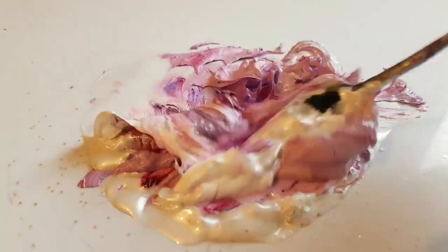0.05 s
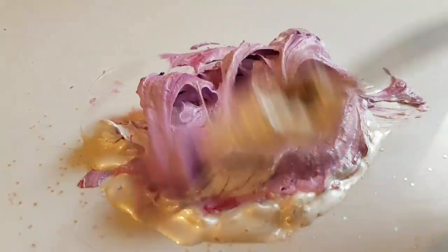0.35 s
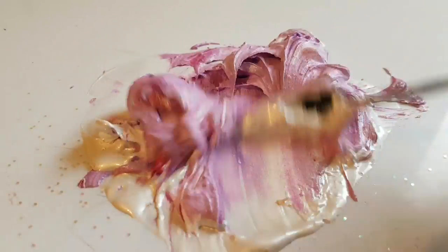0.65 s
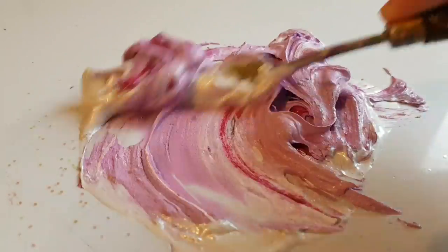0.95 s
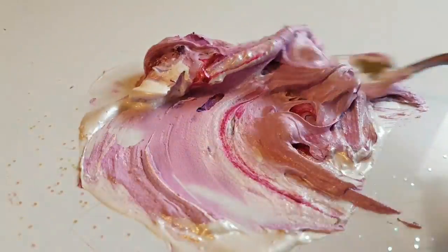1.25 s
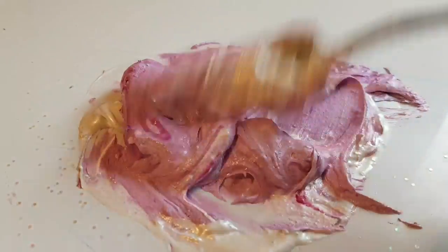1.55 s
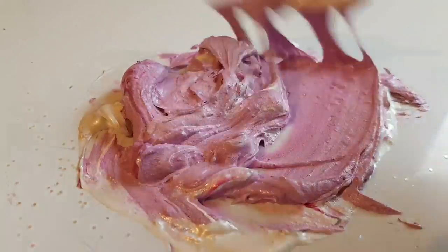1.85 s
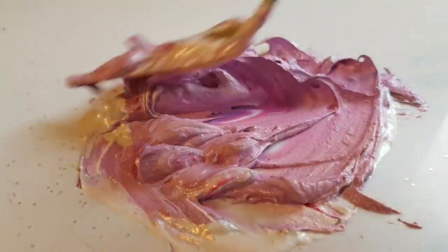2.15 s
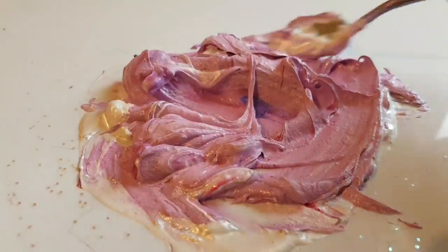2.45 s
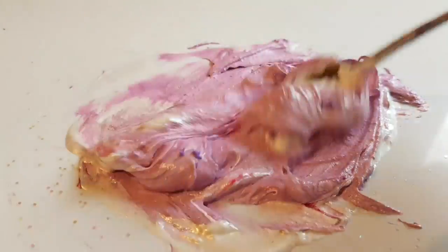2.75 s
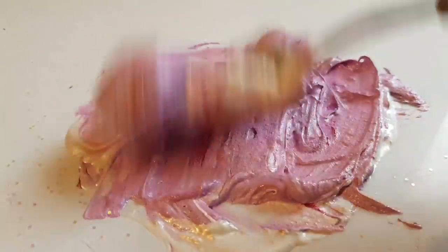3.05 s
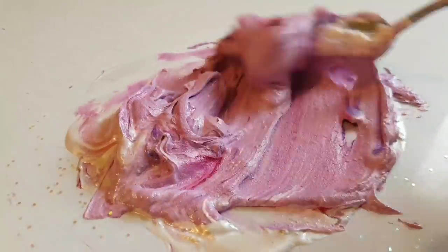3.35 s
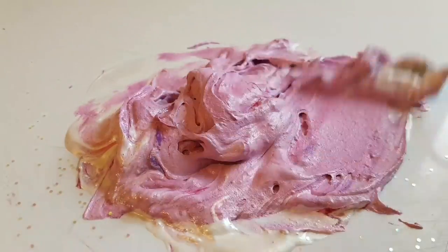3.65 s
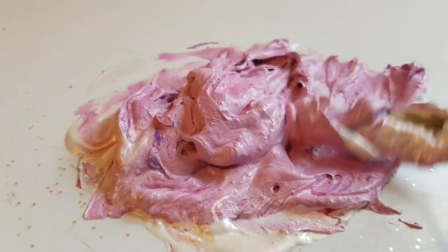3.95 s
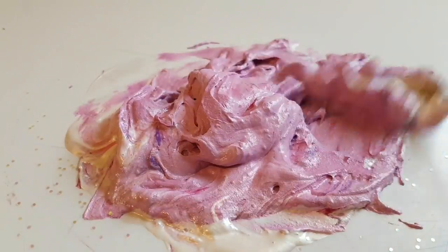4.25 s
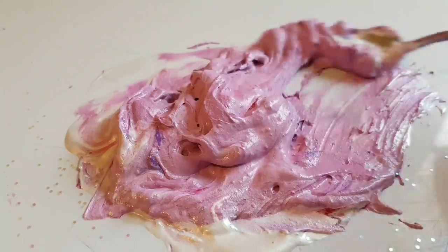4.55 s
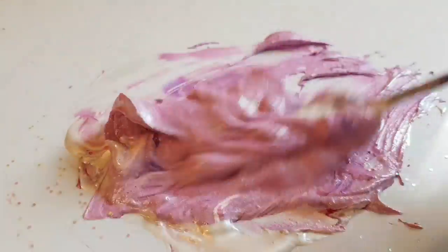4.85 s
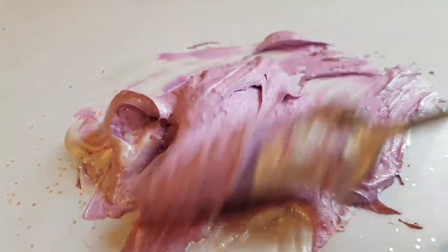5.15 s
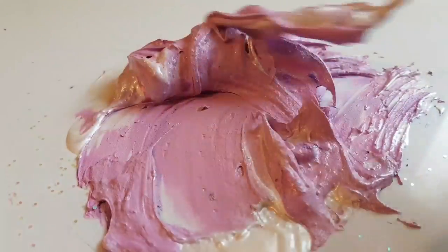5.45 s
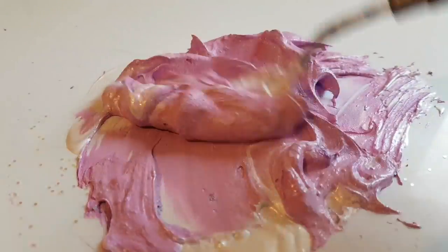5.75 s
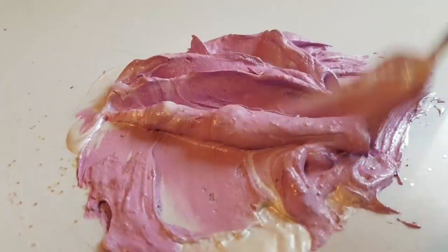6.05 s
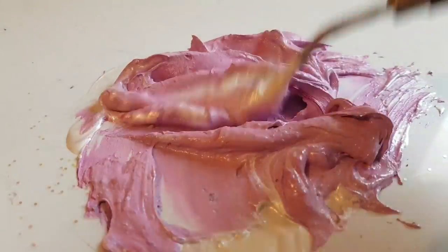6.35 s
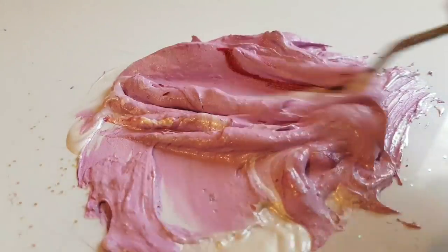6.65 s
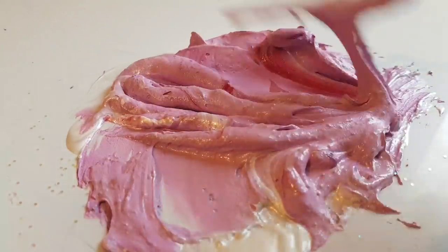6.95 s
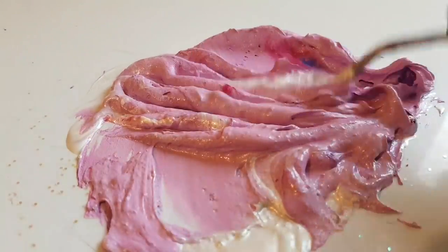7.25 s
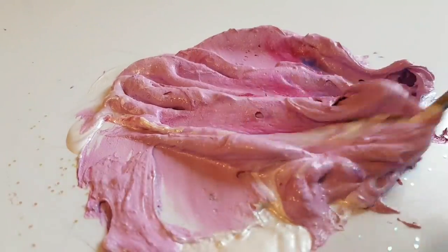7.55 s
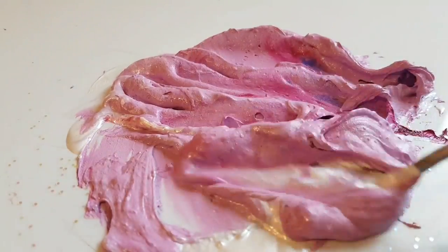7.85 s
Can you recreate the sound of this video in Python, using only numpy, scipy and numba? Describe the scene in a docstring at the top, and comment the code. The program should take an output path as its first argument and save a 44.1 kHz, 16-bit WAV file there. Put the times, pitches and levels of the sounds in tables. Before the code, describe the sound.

Close, sticky squelches and small air pops of paint being mixed with a steel knife, over the dull hum of vehicles outside.

```python
"""A steel palette knife folds thick paint on a glossy slab, close up in a quiet room.
Each stroke tears the wet film in a fine sticky hiss; trapped air pockets pop as the blade lifts,
threads of paint part with a tick, and now and then the steel knocks on the slab.
Outside, over dull road noise, a motor vehicle pulls away through its gears and another passes
farther off; their drone sets the low modes of the room booming."""
import sys
import numpy as np
from scipy import signal
from scipy.fft import rfft, irfft
from scipy.io import wavfile
from scipy.ndimage import uniform_filter1d
from numba import njit

SR = 44100
rng = np.random.default_rng(int(sys.argv[2]) if len(sys.argv) > 2 else 0)


def master_out(mix):
    """Clip the mix to full scale and print it as 16-bit PCM to the path in sys.argv[1]."""
    frames = np.transpose(np.atleast_2d(mix))
    ceiling = np.clip(frames, -1, 1)
    pcm = np.round(ceiling * 32767).astype(np.int16)
    wavfile.write(sys.argv[1], SR, pcm)


N = 352359
TIME = np.arange(N) / SR

# Knife strokes, before the layer gains; squelch and body ride on the hiss level:
# touch_s, peak_s, hiss_db, squelch_db, body_db, gap_at_peak_hz
STROKES = [(0, .002, -62.5, -3, 3, 5800), (.152, .202, -67, -3, -5, 4800),
           (.325, .362, -61.5, -3, -6, 5800), (.504, .524, -64, -1, -3, 6000),
           (.719, .722, -64.5, 4, -2, 4740), (.733, .748, -68.5, 1, 0, 4800),
           (.906, 1.049, -63.5, 0.5, -2.5, 4840), (1.3, 1.365, -62, 4, 0.5, 4840),
           (1.51, 1.535, -70, 5.5, 2.5, 5200), (1.71, 1.729, -64, 3.5, 0, 5800),
           (1.875, 1.898, -64, 2, 0, 6300), (2.07, 2.1, -65, -13, -6, 7000),
           (2.34, 2.385, -73, -1, -6, 5800), (2.567, 2.652, -63.5, 5, 1.5, 5300),
           (2.846, 2.87, -69, 4, -1.5, 5830), (3.018, 3.034, -65, -9, -9, 5790),
           (3.205, 3.222, -70.5, -8, -1, 5810), (3.35, 3.39, -74, -6, 1, 5800),
           (3.972, 4.007, -59, 5, -4.5, 6000), (4.149, 4.197, -56, 1, -5, 6490),
           (4.319, 4.326, -62.5, 5, 1, 4500), (4.335, 4.37, -55, 0, -6, 6000),
           (4.495, 4.545, -55.5, 5, -5, 6100), (4.649, 4.655, -68, 4, 2.5, 5655),
           (4.66, 4.705, -66.5, 7, -5, 6440), (4.68, 4.77, -56, 0, -2, 5200),
           (5.085, 5.125, -72, -2, 0, 5620), (5.289, 5.345, -55.5, -3.5, -6.5, 5200),
           (5.42, 5.438, -66.5, 4, -3.5, 5610), (5.615, 5.727, -70, -1, 0.5, 5640),
           (5.901, 5.95, -72, 1, -2, 5200), (6.092, 6.152, -74, -10, -6, 5805),
           (6.274, 6.355, -75.5, -1, 2.5, 5600), (6.48, 6.55, -73.5, 2, 1, 5630),
           (6.763, 6.81, -79, 5, 2.5, 6606), (7.47, 7.484, -75, 10, -7, 5540),
           (7.831, 7.85, -77, 8, 4, 6200)]
# The blade's steady drag between strokes: time_s, level_db
BLADE_DRAG = [(0, -91), (1.2, -80.5), (3.5, -84), (5.5, -85), (6.4, -86), (7.99, -81)]
# Tone of the tearing film, its bright top and its midrange: freq_hz, level_db
HISS_EQ = [(5000, -38), (8000, -4.5), (11000, -4.5), (15500, -7)]
BODY_EQ = [(600, -12), (1200, 0.5), (1900, -3.5), (2450, 3), (3000, -0.5), (3900, 0), (5500, -13)]

# Traffic through the walls: time_s, rumble_db, tyre_roar_db
TRAFFIC_LEVELS = [(0, -53.5, -60), (.7, -55, -60), (1.4, -51.5, -55), (2.1, -55, -58), (2.85, -52, -59),
                  (3.5, -52, -58.5), (4.0, -51, -57), (4.7, -49.5, -59.5), (5.4, -52, -60),
                  (6.3, -54, -61.5), (7.1, -53, -62), (7.99, -54, -60.5)]
# Swells of the road noise: time_s, deep_rumble_db, room_boom_db
TRAFFIC_SWELLS = [(0, -69, -70), (.7, -71, -60.5), (1.25, -59.5, -61.5), (1.65, -66, -61.5),
                  (2.6, -72, -64), (3.35, -67, -73), (4.7, -68, -71.5), (7.99, -68, -80)]
# Tone of each noise bed: freq_hz, level_db
RUMBLE_EQ = [(25, -20), (45, -10), (65, -7), (100, 8), (150, 11.5), (190, 0), (255, 2.5), (330, -4),
             (420, -6.5), (700, -37)]
TYRE_EQ = [(300, -9.5), (400, 0.5), (470, 1), (620, -2.5), (800, -8.5), (1200, -14), (2500, -22)]
DEEP_RUMBLE_EQ = [(40, -6.5), (55, 1), (75, -3)]
ROOM_TONE_EQ = [(530, 4), (900, -3), (1250, 0.5), (1790, -7), (3260, -4.5), (5480, -11.5), (8500, -16),
                (11600, -22), (14500, -22), (15400, -20), (16000, -45)]
# How alike the beds are left and right: freq_hz, likeness (0 wide, 1 mono)
STEREO_LIKENESS = [(60, 0.98), (140, 0.98), (350, 0.91), (700, 0.86), (1400, 0.02), (2800, 0), (15000, 0)]

# Air pockets; tear 0 rings like a closed cup, 1 rips wide open; snap and plop ride on the level:
# start_s, level_db, cavity_hz, tear, snap_db, plop_hz, plop_db, left_over_right_db
AIR_POCKETS = [(0.1607, -7, 4100, 0.41, -23, 1300, -19, 2), (0.203, -21, 4300, 0.26, -9.5, 1400, -16, 5),
               (0.331, -15, 4750, 1, -17, 1690, -10, 6), (.497, -11.5, 4500, 0.98, -18, 2300, -9, 2),
               (0.5222, -16.5, 3400, 0.47, -18, 1250, -0.5, 2), (0.7189, -6, 5100, 0.17, -9, 1300, -23, 1),
               (0.7198, -8, 5200, 0.52, -5, 1800, -17, -1), (0.7245, -9.5, 3900, 0.4, -17, 1400, -6, 3),
               (1.0434, -9, 4160, 0.38, -17, 1100, -11, 8), (1.3517, -2.5, 3350, 0.38, -28, 1110, -25, -2),
               (1.363, -13, 7000, 0.72, -15, 2400, -9, -3), (1.374, -5, 2540, 0.21, -27, 1100, -22, -2),
               (1.376, -12, 5300, 0.61, -22, 2430, -5, -4), (1.3818, 0.5, 5050, 0.98, -23.5, 2390, -20, -7),
               (1.4206, -6, 4860, 0.68, -34, 1630, -13.5, -5), (1.513, -15, 3740, 0.32, -25, 1100, -14, 5),
               (2.2833, -9.5, 4100, 0.6, -32, 1100, -16, 3), (3.0386, -22.5, 3453, 0.27, -15, 1100, -20, 5),
               (3.3494, -16.5, 3600, 0.69, -13, 1300, -12, 2),
               (3.3709, -17, 5400, 0.85, -12.5, 1100, -18, 1), (3.9595, -16, 4500, 0.6, -18, 1500, -11, 0),
               (4.015, -9, 6410, 0.53, -15, 1400, -24, 4), (4.2805, -18.5, 6000, .55, -21, 1500, -3, -6),
               (4.3297, -13.5, 2730, 0.7, -23, 1100, -20, -3),
               (4.3546, -12, 8000, 0.98, -12, 2300, -18, -2), (4.4918, -15, 5000, 1, -11, 2090, -2, 0),
               (4.5447, -6.5, 6260, 0.13, -16.5, 1400, -24, -8),
               (4.564, -11, 5900, 0.31, -23, 1400, -24, 2), (4.6506, -14, 5460, 0.55, -24, 1310, -8, 0),
               (4.796, -10.5, 3000, 0.37, -19, 1100, -22, 2),
               (5.0951, -4, 3600, .42, -24.5, 2300, -11, 4.5), (5.1624, -10.5, 4030, 0, -25, 1100, -28, -1),
               (5.29, -7.5, 3570, 0.29, -27, 1100, -28, 6), (5.3812, -10.5, 3920, .15, -23, 1100, -10, 5),
               (5.6345, -18, 6770, .12, -28, 1107, -18, 0), (5.853, -19, 3680, 0.67, -15, 1300, -7, 6),
               (6.158, -19.5, 4130, 0.95, -6.5, 1099, -2, 4), (6.2623, -3.5, 3950, .46, -34, 1308, -9.5, 2),
               (6.474, -22, 4270, 0.86, -12, 1200, 0, 4), (6.5876, -17.5, 4670, 0.71, -13.5, 1670, -0.5, 1),
               (6.8174, -17.5, 5400, 0.45, -24, 1100, -22, -2),
               (7.0303, -15, 5630, 0.72, -16, 2294, -8, -4), (7.15, -19, 3600, 0.62, -11, 1113, -16, -1),
               (7.2658, -11.5, 4000, 1, -12.5, 2000, -9, 1), (7.483, -16, 5370, .38, -24, 2298, -20, -4),
               (7.489, -16, 4300, .5, -24, 1400, -22, 0), (7.5925, -19, 3680, 0.32, -15.5, 1100, -8, 5),
               (7.6697, -14.5, 2304, 0.73, -14.5, 1100, -28, -3),
               (7.9476, -18, 3844, 0.53, -23, 1550, -0.5, 5)]

# The far engine, before the room's lift: time_s, firing_hz, level_db
FAR_ENGINE_RUN = [(0, 140.3, -93), (.3, 140.4, -61), (.55, 135.9, -59.5), (.82, 140, -63),
                  (.92, 142.5, -53.5), (1.38, 148.2, -52), (1.52, 152, -58), (2.25, 156.4, -56),
                  (2.55, 154.1, -70.5), (2.85, 152.3, -54.5), (3.05, 152.5, -74), (3.35, 152.9, -75),
                  (3.7, 152, -90), (4.9, 149, -68), (5.2, 148, -57), (5.45, 151.1, -66.5),
                  (7.99, 154.5, -94)]
# Its throb an octave below: time_s, level_db
FAR_THROB_LEVELS = [(0, -71), (1.4, -69), (1.9, -61.5), (2.3, -65), (2.8, -64.5), (3.35, -64), (3.9, -86),
                    (7.99, -88)]
# Its partials: firing_multiple, level_db
FAR_PARTIALS = [(1, -1.5), (3, -17)]
# Low room modes that lift any engine tone crossing them: pitch_hz, width_hz, lift_db
BOOM_MODES = [(56, 3.2, 2), (77.1, 0.81, 9), (147.25, 8, 12), (256.2, 7.5, 12), (303, 12.95, 8),
              (460.6, 4.5, 11.5)]

# Threads of paint parting as the blade pulls away: start_s, level_db
THREAD_TICKS = [(.578, -41), (.5875, -38), (.6933, -34), (0.804, -42), (1.2913, -31), (1.3975, -39),
                (2.042, -42), (2.061, -45), (2.242, -39), (2.5263, -36.5), (3.283, -38), (3.874, -41),
                (5.519, -31.5), (7.101, -43), (7.154, -45), (7.37, -44), (7.575, -46)]
# The blade knocking on the slab through the paint: start_s, slab_db, blade_db
BLADE_KNOCKS = [(0.719, -54, -69), (.7243, -50, -64), (1.4196, -53, -76), (5.0948, -50, -77),
                (5.2909, -53, -79)]
# Ring of the slab and of the blade: pitch_hz, level_db, t60_s
SLAB_MODES = [(283, 11.5, 0.021), (454, 8.5, 0.033), (710, -14, 0.059), (1060, -9, 0.019)]
BLADE_MODES = [(3900, -8, .1), (5200, 5, .09)]

# The near engine, before the room's lift: time_s, level_db
NEAR_ENGINE_LEVELS = [(1.4, -87), (1.55, -52), (1.85, -52.5), (2.2, -53), (2.6, -51), (2.85, -48),
                      (3.15, -49), (4.05, -48), (4.58, -42.5), (4.95, -52.5), (5.3, -48), (5.9, -53),
                      (6.08, -50.5), (6.25, -60.5), (6.8, -48.5), (7.5, -44), (7.99, -45)]
# Its gears, one a row: pull_s, lift_off_s, start_firing_hz, initial_rise_hz_per_s
NEAR_GEARS = [(1.655, 2.31, 115.5, 30), (2.901, 4.56, 112.3, 25.9), (5.5, 8, 110.7, 13.3)]
# Its partials: firing_multiple, level_db
NEAR_PARTIALS = [(.5, -35), (1, 0), (2, -22.5)]


def from_db(db):
    return 10 ** (np.asarray(db) / 20)


def unit_rms(x):
    return x / np.sqrt(np.mean(x ** 2) + 1e-20)


def automation(rows):
    """One curve over time for each column after the first."""
    times_s, *columns = np.transpose(rows)
    return [np.interp(TIME, times_s, column) for column in columns]


def per_bin(points):
    """A table over frequency, read at every bin of the spectrum."""
    hz, value = np.transpose(points)
    return np.interp(np.log(np.arange(N // 2 + 1) * SR / N + 1), np.log(hz), value)


def colour(x, eq):
    """Shape white noise with an EQ that rolls off past its ends, keeping the power."""
    curve = [(eq[0][0] / 2, -70), *eq, (eq[-1][0] * 2, -70)]
    return irfft(rfft(x) * unit_rms(from_db(per_bin(curve))), N)


def drift(rate_hz, hop=40):
    """Smooth random wander of spread 1."""
    pole = np.exp(-2 * np.pi * rate_hz * hop / SR)
    noise = rng.standard_normal(N // hop + 2002)
    slow = signal.lfilter([1], [1, -2 * pole, pole * pole], noise)[2000:]
    return np.interp(np.arange(N) / hop, np.arange(len(slow)), unit_rms(slow))


def resonate(x, hz, width_hz):
    """One resonance with unity peak gain; its width is capped at a Q of 0.8."""
    q = max(hz / width_hz, .8)
    return signal.lfilter(*signal.iirpeak(min(hz, SR / 3), q, fs=SR), x + 1e-18)


@njit
def sweep(x, hz, q):
    """A moving resonance with unity peak gain."""
    out, low, band = np.zeros(len(x)), 0., 0.
    for i in range(len(x)):
        g = np.tan(np.pi * hz[i] / SR)
        v = (band + g * (x[i] - low)) / (1 + g * (g + 1 / q))
        band, low = 2 * v - band, low + 2 * g * v
        out[i] = v / q
    return out


def impulses(times_s, levels_db):
    return np.bincount(np.round(times_s * SR).astype(int), from_db(levels_db), N)


def scatter(x, near_db, near_s=.0007, echo_db=-15, echo_s=.0046, size=512):
    """Spread to stereo: direct sound, quick reflections off slab and blade, one close echo."""
    t = np.arange(size) / SR
    paths = rng.standard_normal((2, size)) * np.exp(-t / near_s) * (1 - np.exp(-2 * t / near_s))
    paths /= np.linalg.norm(paths, axis=1, keepdims=True)
    echo = np.roll(paths[::-1], int(echo_s * SR), axis=1)
    response = from_db(near_db) * paths + from_db(echo_db) * echo
    response[[0, 1], rng.integers(2, 7, 2)] += 1  # direct sound
    heard = signal.fftconvolve(x[None], response, axes=1)[:, :len(x)]
    return unit_rms(heard) * np.sqrt(np.mean(x ** 2))


def ruptures(per_s, spread_db):
    """Tiny clicks at random moments, a few larger than the rest."""
    count = int(per_s * N / SR)
    sizes = from_db(spread_db * np.minimum(rng.exponential(1, count), 5)) * rng.choice([-1, 1], count)
    return unit_rms(np.bincount(rng.integers(0, N, count), sizes, N))


def tearing_film(per_s=3600, places=10):
    """The film ruptures in clumps along the blade, each place with its own left-right delay."""
    out = np.zeros((2, N))
    for lag in range(-places // 2, places // 2):
        place = ruptures(per_s / places, spread_db=1)
        out += [place, np.roll(place, 3 * lag + 1)]
    clumps = unit_rms(out * from_db(1.8 * drift(120)))
    haze = from_db(1) * rng.standard_normal((2, N))  # reflections fill in between the ruptures
    return unit_rms(clumps + haze)


def pore_crackle(per_s=390, pitches=14):
    """Larger pores burst one by one, each with a brief ring at its own pitch."""
    pores = sum(unit_rms(resonate(ruptures(per_s / pitches, spread_db=2), hz, width_hz=510))
                for hz in np.geomspace(4200, 14500, pitches))
    return unit_rms(scatter(pores, near_db=-6))


def stroke_curves(fade_db_per_s=428, gap_fall_oct_per_s=1.6, opening_s=.0029, usual_db=-59):
    """Strokes swell with the blade's speed and die as it lets go; the opening gap falls in pitch."""
    drag_db, = automation(BLADE_DRAG)
    power = np.array([from_db(drag_db) ** 2] * 3)  # hiss, squelch, body
    layer_delay_s = np.array([[0], [opening_s], [opening_s]])
    gap_hz = np.full(N, float(STROKES[0][5]))
    for touch_s, peak_s, hiss_db, squelch_db, body_db, peak_hz in STROKES:
        swell_db = max(14.5 + .73 * (hiss_db - usual_db), 0)  # harder strokes swell more
        active = np.flatnonzero((TIME >= touch_s) & (TIME < peak_s + .5))
        past_peak_s = TIME[active] - peak_s - layer_delay_s
        rise_left = np.minimum(-past_peak_s / max(peak_s - touch_s, .001), 1)
        below_peak_db = np.maximum(swell_db * rise_left, fade_db_per_s * past_peak_s)
        layer_db = hiss_db + np.array([[0], [squelch_db], [body_db]])
        power[:, active] += from_db(layer_db - below_peak_db) ** 2
        gap_hz[active] = peak_hz * 2 ** np.clip(-gap_fall_oct_per_s * past_peak_s[1], -.5, .5)
    return np.sqrt(power), gap_hz


def knife_strokes(gap_wobble_oct=.14, gap_q=2.1):
    """The wet film tears in a sticky hiss and squelches through the gap under the blade."""
    envelopes, gap_hz = stroke_curves()
    film = tearing_film()
    gap_hz = np.minimum(gap_hz * 2 ** (gap_wobble_oct * drift(50)), SR / 3)
    gap = unit_rms(np.array([sweep(sweep(side, gap_hz, gap_q), gap_hz, gap_q / 2) for side in film]))
    # small, middling and large pores come in patches of their own, so the colour keeps shifting
    hiss, squelch, body = (envelope * unit_rms(from_db(2.2 * drift(60))) for envelope in envelopes)
    return (from_db(1.5) * colour(hiss * film, HISS_EQ) + hiss * pore_crackle()
            + squelch * gap + from_db(6.5) * colour(body * film, BODY_EQ))


def noise_bed(eq):
    """Noise from all around: near mono in the bass, wide in the treble."""
    alike = np.clip(per_bin(STEREO_LIKENESS), 0, 1)
    mid, side = rfft(rng.standard_normal((2, N)))
    stereo = irfft(np.sqrt(1 + alike) * mid + np.sqrt(1 - alike) * side * [[1], [-1]], N)
    return unit_rms(colour(stereo, eq))


def road_and_room_tone():
    """Dull road noise, its roar swelling in a low room resonance, and the room's even hiss."""
    rumble_db, roar_db = automation(TRAFFIC_LEVELS)
    deep_db, boom_db = automation(TRAFFIC_SWELLS)
    rumble = from_db(rumble_db) * noise_bed(RUMBLE_EQ)
    tyres = from_db(roar_db - 1.5 + drift(7.3)) * noise_bed(TYRE_EQ)
    boom = from_db(boom_db) * unit_rms(resonate(noise_bed(TYRE_EQ), hz=475, width_hz=71))
    deep = from_db(deep_db) * noise_bed(DEEP_RUMBLE_EQ)
    return rumble + tyres + boom + deep + from_db(-66.5) * noise_bed(ROOM_TONE_EQ)


def whiten(x):
    """Even out the colour of a short burst, keeping its ragged shape in time."""
    spectrum = rfft(x)
    power = uniform_filter1d(np.abs(spectrum) ** 2, size=25)
    return irfft(spectrum / np.sqrt(power + 1e-12), len(x))


def air_pops(closed_width_hz=370, torn_width_hz=21000, size=2048, lead=256):
    """A pocket snaps open, its cavity rings and its wall plops; a wider tear rings less."""
    out = np.zeros((2, N + size + lead))
    t = (np.arange(size) - lead) / SR
    # the skin crackles just before the rupture and a little longer after it
    fizz = from_db(-20) * np.exp(np.minimum(t / .0006, -t / .0011))
    fizz += from_db(-35) * np.exp(-np.abs(t) / .005) * (t > 0)
    for start_s, level_db, cavity_hz, tear, snap_db, plop_hz, plop_db, pan_db in AIR_POCKETS:
        burst = whiten(.74 * (t == 0) + fizz * rng.standard_normal(size))
        snap = resonate(burst, hz=6600, width_hz=10010)
        widening = (torn_width_hz / closed_width_hz) ** (tear ** 2)
        width_hz = closed_width_hz * widening
        cavity = resonate(resonate(burst, cavity_hz, 1.3 * width_hz), cavity_hz, 7 * width_hz)
        cavity_gain = from_db(np.interp(tear, [0, 1], [-7.5, -4.5])) / np.sqrt(widening)
        plop = resonate(resonate(burst, plop_hz, width_hz=440), plop_hz, 2 * plop_hz)
        plop += from_db(-18) * resonate(burst, hz=510, width_hz=200)
        pop = from_db(snap_db) * snap + cavity_gain * cavity - from_db(plop_db) * plop
        side_gains = from_db(level_db + pan_db * np.array([[.5], [-.5]]))
        at = round(start_s * SR)
        out[:, at:at + size] += side_gains * scatter(pop, near_db=-7)
    return out[:, lead:lead + N]


def drone(firing_hz, level_db, partials, flutter_db=1):
    """Muffled engine partials: each flutters on its way in and booms as it crosses a room mode."""
    out = np.zeros(N)
    phase = 2 * np.pi * np.cumsum(firing_hz) / SR + .13 * drift(25)
    for multiple, partial_db in partials:
        lift = sum(from_db(lift_db) ** 2 / (1 + (2 * (multiple * firing_hz - mode_hz) / width_hz) ** 2)
                   for mode_hz, width_hz, lift_db in BOOM_MODES)
        gain = from_db(level_db + partial_db + flutter_db * drift(16))
        out += np.sqrt(2 + 2 * lift) * gain * np.sin(multiple * phase)
    return out


def far_engine():
    """A distant engine gathers speed, cruises with a throb an octave below and fades."""
    firing_hz, level_db = automation(FAR_ENGINE_RUN)
    throb_db, = automation(FAR_THROB_LEVELS)
    hum = drone(firing_hz, level_db, FAR_PARTIALS, flutter_db=.9)
    return hum + drone(firing_hz, throb_db, [(1 / 2, 0)])


def paint_threads():
    """Each thread parts with one thin, bright tick."""
    ticks = resonate(impulses(*np.transpose(THREAD_TICKS)), hz=8300, width_hz=12000)
    return scatter(ticks, near_db=-3, near_s=.0008, echo_db=-14)


def slab_knocks(size=8192):
    """Steel meets slab: the table soon damps the low modes, the thin blade pings a little longer."""
    out, t = np.zeros(N), np.arange(size) / SR
    start_s, slab_db, blade_db = np.transpose(BLADE_KNOCKS)
    for strength_db, modes in ((slab_db, SLAB_MODES), (blade_db, BLADE_MODES)):
        ring = sum(from_db(level_db - 60 * t / t60_s) * np.sin(2 * np.pi * hz * t)
                   for hz, level_db, t60_s in modes)
        out += signal.fftconvolve(impulses(start_s, strength_db), ring)[:N]
    return out


def near_engine(rev_range_hz=89.7):
    """In each gear the pull slackens as the revs climb; in a shift they drop fast, then settle."""
    firing_hz, top_hz, lifted_s = np.zeros(N), NEAR_GEARS[0][2], 0
    for pull_s, lift_off_s, start_hz, rise_hz_per_s in NEAR_GEARS:
        shift_left = np.clip((pull_s - TIME) / (pull_s - lifted_s), 0, 1)
        settling_hz = (top_hz - start_hz) * shift_left ** 3
        pulled_s = np.clip(TIME - pull_s, 0, lift_off_s - pull_s)
        climb_hz = rev_range_hz * (1 - np.exp(-rise_hz_per_s * pulled_s / rev_range_hz))
        firing_hz = np.where(TIME >= lifted_s, start_hz + climb_hz + settling_hz, firing_hz)
        top_hz, lifted_s = firing_hz[-1], lift_off_s
    level_db, = automation(NEAR_ENGINE_LEVELS)
    return drone(firing_hz, level_db, NEAR_PARTIALS)


def room_tail(x, t60_s=.1, predelay_s=.006, size=16384):
    """A short diffuse tail from the walls."""
    t = np.arange(size) / SR
    tail = rng.standard_normal((2, size)) * from_db(-60 * t / t60_s) * (t > predelay_s)
    tail /= np.linalg.norm(tail, axis=1, keepdims=True)
    return signal.fftconvolve(x, tail, axes=1)[:, :N]


def scene():
    """Paint a touch to the right, the street a touch to the left."""
    paint = (knife_strokes() + air_pops() + paint_threads() + slab_knocks()) * from_db([[-.3], [.3]])
    street = (near_engine() + far_engine() + road_and_room_tone()) * from_db([[.4], [-.4]])
    return paint + from_db(-14) * room_tail(paint) + street


def record(dry, cutoff_hz=15700):
    """A steep low-pass takes off the very top."""
    return signal.sosfilt(signal.ellip(10, .2, 70, cutoff_hz, fs=SR, output="sos"), dry)


dry = scene()
out = record(dry)
master_out(out)
```